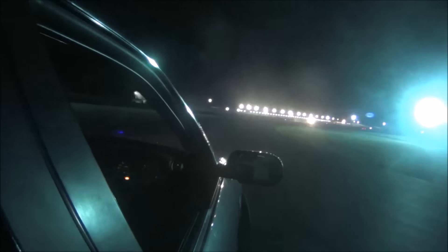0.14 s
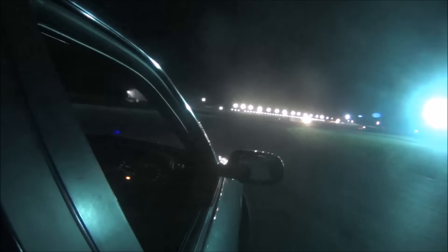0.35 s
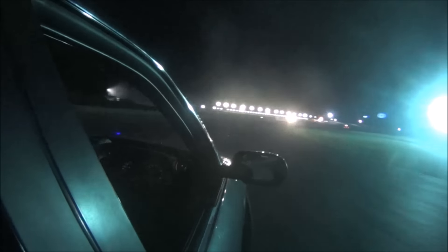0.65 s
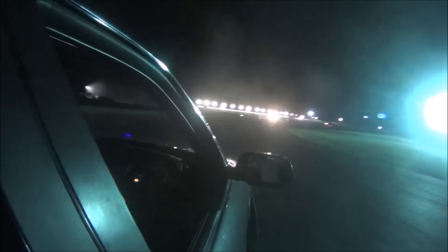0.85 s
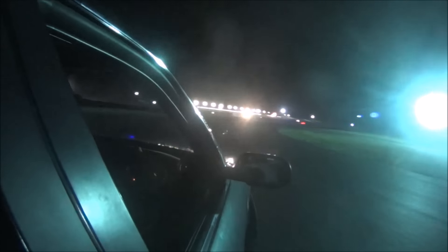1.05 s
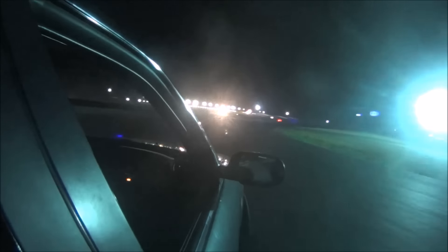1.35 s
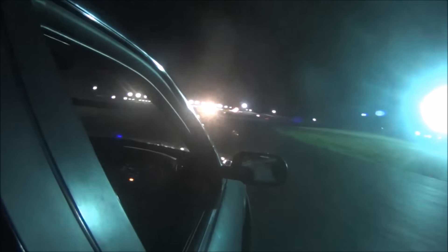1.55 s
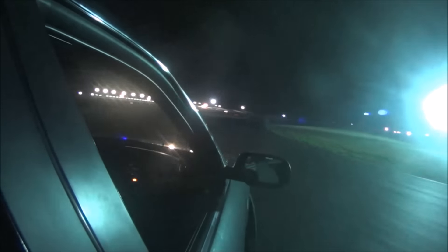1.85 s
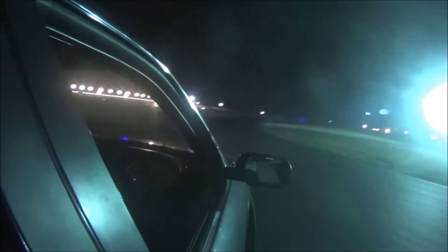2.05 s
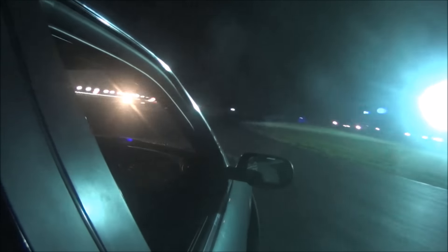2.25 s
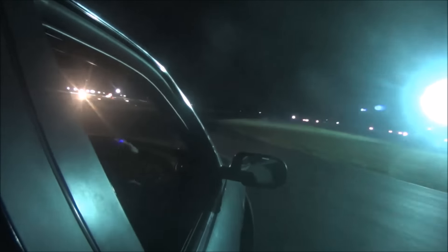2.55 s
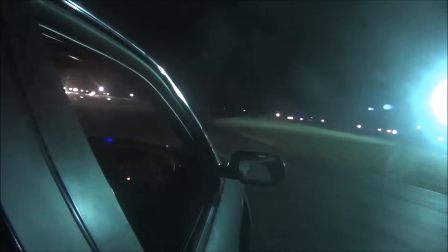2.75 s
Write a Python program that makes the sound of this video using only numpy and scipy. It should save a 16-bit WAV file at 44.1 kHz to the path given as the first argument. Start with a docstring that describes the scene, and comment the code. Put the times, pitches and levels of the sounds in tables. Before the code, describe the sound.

A car drifts on a race track with a continuous wavering tyre squeal, while its high engine note keeps cutting out, each cut followed by an exhaust thump. Rubber scrubs the asphalt and wind rumbles at the door-mounted microphone.

```python
"""A drift car's engine is held on the rev limiter as it slides round a track, heard from the door.
Each time the limiter cuts the ignition, the engine note drops, then the exhaust pipe thumps and booms.
The spinning rear tyres squeal as their tread grips and lets go, and their pitch sags after the cuts.
Behind them, rubber roars over the asphalt and wind buffets the door."""
import sys
import numpy as np
from scipy import signal
from scipy.fft import rfft, irfft
from scipy.io import wavfile
from scipy.ndimage import uniform_filter1d

SR = 44100
rng = np.random.default_rng(int(sys.argv[2]) if len(sys.argv) > 2 else 0)


def dump(signal):
    """Clip the signal to [-1, 1] and save it as 16-bit WAV at the path in sys.argv[1]."""
    limited = np.clip(np.atleast_2d(signal).T, -1, 1)
    pcm = np.round(limited * 32767).astype(np.int16)
    wavfile.write(sys.argv[1], SR, pcm)


N = 128331
T = np.arange(N) / SR

# Ignition cuts: t/s, length/s, dip of the engine note/dB, thump level/dB, drop of the squeal/Hz
CUTS = [(.149, .024, -26, -0.5, 39.7), (0.303, .028, -12, 1, 47.4), (0.447, 0.025, -4.5, -3, 109.9),
        (.588, .026, -24, 0.5, 134), (0.725, .028, -13, -3.5, 105), (0.85, .036, -8, -7, 49.36),
        (1.071, .045, -6, -3.5, 48), (1.208, .036, -11, 1.5, 59.8), (1.35, 0.038, -14, -0.5, 71),
        (1.484, 0.045, -9, 0.5, 55.34), (1.619, 0.023, -7.5, 2.5, 63), (1.705, .022, -11.5, 1.5, 87),
        (1.79, 0.028, -9.5, -2, 66), (1.916, 0.024, -12, -11, 57), (1.983, 0.035, -15, -7, 69.8),
        (2.062, .018, -17.5, -3, 53), (2.137, .022, -16.5, 2, 99), (2.214, 0.023, -14, 1.5, 88),
        (2.311, 0.02, -3, -13, 29.92), (2.383, .016, -9, -2, 30.3), (2.51, .024, -6.5, 4, 26.8),
        (2.572, 0.025, -11.5, -4, 29.6), (2.727, .03, -6, 2.5, 19.3), (2.836, 0.041, -7, 0.5, 27.7)]
def engine():
    """The firing cylinders make a note that gets quieter and lower at each cut."""
    firing_hz, sag_hz_per_db = 362, 1.82  # deeper cuts lose more revs
    sag_db = sum(dip * sag(at - length / 2, lag_s=.022) for at, length, dip, *_ in CUTS)
    firings = np.cumsum(firing_hz + sag_hz_per_db * sag_db + 2.8 * wobble(25)) / SR
    dip_db = sum(dip * bump(at, length) for at, length, dip, *_ in CUTS)
    burning = gain(dip_db + 1.6 * wobble(67))
    phase = 2 * np.pi * firings
    note = pan(gain(-22.5) * np.sin(phase), db=-4) + pan(gain(-40) * np.sin(2 * phase), db=6)
    # a run of misfires drones once per turn of the crank, which is every third firing
    drone = gain(-24) * bump(0.9, length_s=.14) * np.sin(phase / 3)
    rumble = np.sqrt(2) * drone + exhaust(firings, burning)
    return np.sqrt(2) * note * burning + pan(rumble, db=-1.5)


# Tone of the exhaust pipe: f/Hz, level/dB
PIPE_TONE = [(40, -15), (90, -20), (120, -1), (165, 3.5), (230, 1.5), (300, -18.5), (450, -11), (570, -13),
             (680, -9), (800, -14.5), (1500, -44.5)]
def exhaust(firings, burning):
    """Uneven firings burble in the pipe; after each cut it thumps and booms as unburnt fuel lights."""
    pops = np.diff(np.floor(firings), prepend=0) * rng.standard_normal(N)
    burble = colour(pops, PIPE_TONE)
    burble /= np.sqrt(uniform_filter1d(burble ** 2, size=900) + 1e-6)  # even out its loudness
    thumps = sum(gain(-22.5 + db) * bump(at + .016, length_s=.043) for at, _, _, db, _ in CUTS)
    booms = sum(gain(-22 + db) * bump(at + .018, length_s=.021) for at, _, _, db, _ in CUTS)
    ring = np.sin(phase_of(hz=165.7 * (1 + .1495 * wobble(30.3))))
    return np.sqrt(2) * ring * booms + burble * np.sqrt(burning) * (gain(-30.5) + thumps)


# The squeal between cuts: t/s, f/Hz, level/dB, level of the octave above/dB
SQUEAL_PATH = [(0, 985, -29.5, -35.5), (.15, 975, -18.5, -37), (.26, 1045, -23.5, -33),
               (.54, 1065, -18, -29), (.7, 1020, -21, -30.5), (.86, 1000, -20.5, -31), (.93, 965, -20, -52),
               (1.0, 970, -17.5, -37), (1.2, 965, -19.5, -37), (1.34, 985, -22, -37),
               (1.48, 965, -18, -30.5), (1.58, 1010, -23, -30.5), (1.9, 955, -17, -28.5),
               (2.05, 1005, -19.5, -34), (2.13, 1010, -20, -40), (2.23, 965, -23, -40),
               (2.28, 1045, -18, -39), (2.33, 940, -19, -33), (2.5, 905, -22, -47), (2.7, 915, -24, -34),
               (2.91, 925, -17, -33)]
def singing_tyre(hz):
    """One tyre sings and chatters: the faster it slips, the harder its tread hops."""
    hop = np.sin(phase_of(hz=58 * (1 + .35 * wobble(30))))
    hop *= np.interp(curve(SQUEAL_PATH, column=1), [927, 1029], [0, 1])  # fades in between these pitches
    phase, strength = stick_slip(hz * (1 + .03 * hop), wander=.01391, jitter=.0239, flutter_db=2.5)
    note = gain(curve(SQUEAL_PATH, column=2)) * np.sin(phase)
    octave_db = curve(SQUEAL_PATH, column=3) + 2 * wobble(18)
    octave = gain(octave_db) * np.sin(2 * phase + .59 * wobble(150))
    return strength * gain(2.2 * hop) * (pan(note, db=1) + pan(octave, db=7))


# Loudness of the slide: t/s, rasping tyre level/dB, rubber roar level/dB, wind level/dB
SLIDE_LEVELS = [(0, -21.5, -20.5, -28.5), (.5, -28.5, -20.5, -31.5), (.92, -28.5, -20.5, -25.5),
                (1.15, -28.5, -20.5, -26.5), (1.6, -25.5, -21.5, -28.5), (2.05, -31, -20.5, -26),
                (2.3, -26.5, -19.5, -25), (2.56, -45, -18, -23.5), (2.91, -26, -19.5, -25)]
def rasping_tyre(hz):
    """The other tyre squeals a little higher and much less steadily, so it rasps."""
    phase, strength = stick_slip(hz * 1.07, wander=.035, jitter=.07, flutter_db=5)
    rasp = np.sin(phase) + gain(-9.5) * np.sin(2 * phase)
    return pan(strength * gain(curve(SLIDE_LEVELS, column=1)) * rasp, db=-6.5)


# How well a tyre sends out each pitch: f/Hz, level/dB
TYRE_TONE = [(600, 0), (800, 2), (890, 0.5), (1050, 0.5), (1300, 4), (1500, -9), (1800, -6), (1950, 5),
             (2200, 6), (2450, -16), (3300, 0), (5000, -10)]
def squeal():
    """Both rear tyres slow down after each cut, which pulls their pitch down."""
    drop_hz = sum(drop * sag(at, lag_s=.022) for at, *_, drop in CUTS)
    hz = curve(SQUEAL_PATH, column=1) - drop_hz
    tyres = singing_tyre(hz) + rasping_tyre(hz)
    return irfft(rfft(tyres) * gain(spectrum(TYRE_TONE)), N)


def stick_slip(hz, wander, jitter, flutter_db):
    """Tread grips and lets go at an unsteady rate; gives its phase and its fluttering strength."""
    phase = phase_of(hz * (1 + wander * wobble(54.6) + jitter * wobble(263.3)))
    strength = gain(flutter_db * wobble(112))
    return phase, strength * np.sqrt(2 / np.mean(strength ** 2))


# Tone of the scrubbing rubber: f/Hz, level/dB
ROAR_TONE = [(200, -48), (520, -27), (680, -19), (790, -14.5), (890, 2.5), (1150, 2.5), (1230, -0.5),
             (1350, 3.5), (1450, -5), (1570, 2), (1720, -2), (1950, -0.5), (2400, -2.5), (3100, -6.5),
             (3600, -16.5), (4500, -32)]
# Tone of grit and air hissing past: f/Hz, level/dB
HISS_TONE = [(2500, -17), (3400, 4), (4200, 2.5), (4700, 3.5), (5500, 1), (6600, -8.5), (8500, -19),
             (9600, -16), (10300, -15), (11000, -10)]
# Loudness of that hiss: t/s, level/dB
HISS_LEVELS = [(0, -36.5), (.42, -35), (.85, -36.5), (1.05, -35.5), (1.2, -37), (1.8, -36), (2.08, -38.5),
               (2.25, -35.5), (2.55, -32), (2.72, -35), (2.91, -36)]
# Which side the roar and hiss come from: f/Hz, left minus right level/dB
SCRUB_SIDES = [(500, -5), (720, 16.5), (900, -4.5), (1200, -2.5), (1600, -4.5), (2050, 3), (2800, 0.5),
               (4300, 2), (7000, -0.5), (11000, -0.5)]
def scrub():
    """Rubber tears over the asphalt in a rough roar, with a flickering hiss above it."""
    roughness = wobble(160)
    roar = colour(stereo_noise(apart=.59), ROAR_TONE)
    roar *= gain(curve(SLIDE_LEVELS, column=2) + .5 * wobble(21) + 1.3 * roughness)
    hiss = colour(stereo_noise(apart=.55), HISS_TONE)
    hiss *= gain(curve(HISS_LEVELS, column=1) + 1.48 * wobble(23) + 1.03 * roughness + .76 * wobble(130))
    return irfft(pan(rfft(roar + hiss), spectrum(SCRUB_SIDES)), N)


# Tone of the wind on the door: f/Hz, level/dB
WIND_TONE = [(20, -10), (45, -7), (95, -3.5), (122, 3.5), (200, -8.5), (300, -6), (520, -15), (900, -22),
             (2000, -60)]
def wind():
    """Air buffets the door with a low, uneven rumble."""
    rumble = pan(colour(stereo_noise(apart=.21), WIND_TONE), db=-2.5)
    return rumble * gain(curve(SLIDE_LEVELS, column=3) + 1.66 * wobble(24))


def gain(db):
    """Turn decibels into a number to multiply by."""
    return 10 ** (np.asarray(db) / 20)


def phase_of(hz):
    """The running angle of a wave whose pitch changes."""
    return 2 * np.pi * np.cumsum(hz) / SR


def curve(table, column):
    """One column of a time table, filled in for every sample."""
    rows = np.array(table)
    return np.interp(T, rows[:, 0], rows[:, column])


def spectrum(table):
    """A frequency table, filled in for every frequency."""
    hz, value = np.array(table).T
    return np.interp(np.log(np.arange(N // 2 + 1) * SR / N + 1e-9), np.log(hz), value)


def colour(x, table):
    """Give a sound the tone in a table, at an average (rms) size of 1."""
    y = irfft(rfft(x) * gain(spectrum(table)), N)
    return y / y.std()


def wobble(rate_hz):
    """A smooth random wobble up to about this rate, of typical size 1."""
    hz = np.arange(N // 2 + 1) * SR / N
    y = irfft(rfft(rng.standard_normal(N)) * np.exp(-(hz / rate_hz) ** 2), N)
    return y / y.std()


def pan(x, db):
    """Make a sound this many dB louder on the left than on the right."""
    return x * gain(np.array([[.5], [-.5]]) * db)


def stereo_noise(apart):
    """Left and right noises that are partly alike."""
    return rng.standard_normal(N) + apart * rng.standard_normal((2, N))


def bump(at, length_s):
    """A flat-topped bump of height 1, this long at half height."""
    return 2 ** -(np.abs(2 * (T - at) / length_s) ** 3)


def sag(start, lag_s):
    """Speed lost after a cut: deepest after the lag, then regained."""
    age = np.maximum(T - start, 0) / lag_s
    return (age * np.exp(1 - age)) ** 2


# How far the wave at the left microphone opening is ahead of the right: f/Hz, phase/rad
LEFT_LEAD = [(30, 0.68), (130, 0.7), (260, 1.26), (360, 1.3), (700, 1.75), (900, 0.26), (1020, -0.65),
             (1300, -0.54), (1900, 1.5), (2300, -0.69), (4000, -0.14), (6000, 0)]
def scene():
    """All sources reach two close microphone openings, slightly out of step."""
    mix = engine() + squeal() + scrub() + wind()
    phase_shift = np.exp(np.array([[.5j], [-.5j]]) * spectrum(LEFT_LEAD))
    return irfft(rfft(mix) * phase_shift, N)


def record(dry):
    """A quick volume control evens out the level; peaks are rounded and the highest treble is cut."""
    target_db, ceiling, top_hz = -12, .88, 11150
    power = uniform_filter1d(np.mean(dry ** 2, axis=0), size=400)
    evened = dry * (gain(target_db) / np.sqrt(power + 1e-9)) ** .43
    rounded = evened / (1 + (evened / ceiling) ** 8) ** (1 / 8)
    return signal.sosfilt(signal.ellip(12, .2, 80, top_hz, fs=SR, output="sos"), rounded)


dry = scene()
out = record(dry)
dump(out)
```